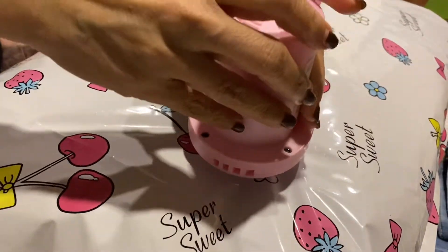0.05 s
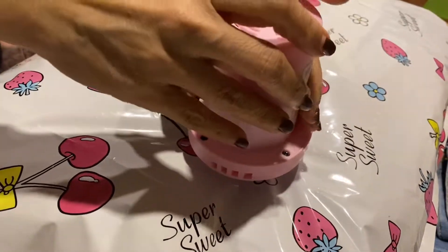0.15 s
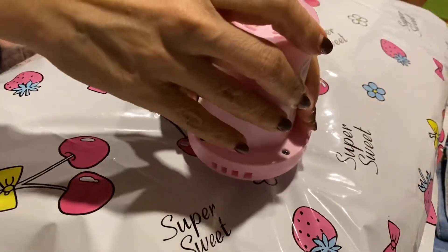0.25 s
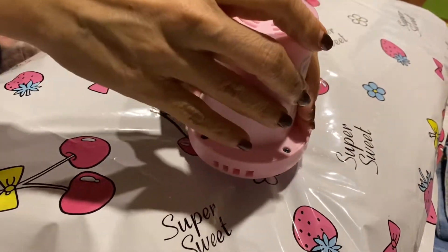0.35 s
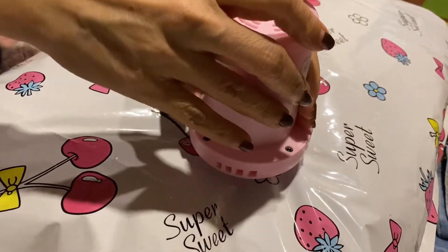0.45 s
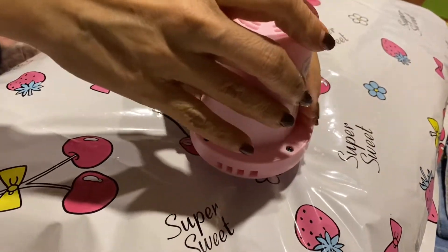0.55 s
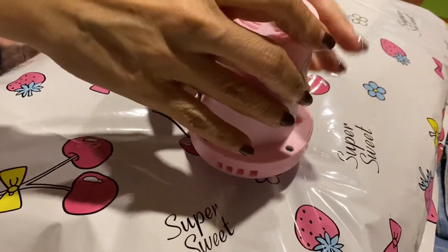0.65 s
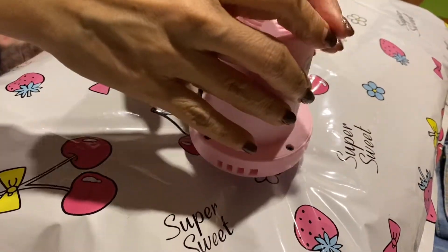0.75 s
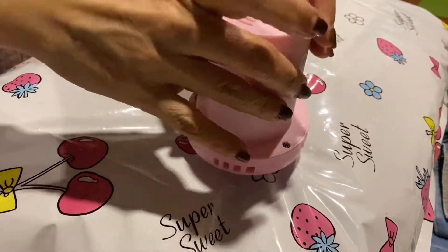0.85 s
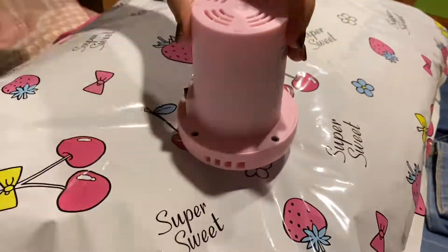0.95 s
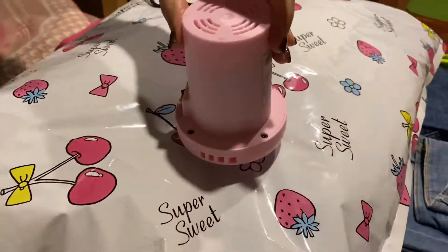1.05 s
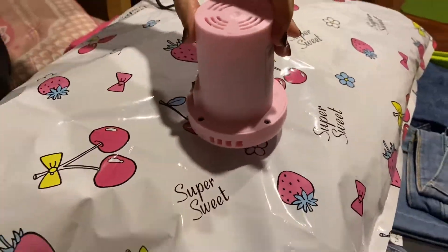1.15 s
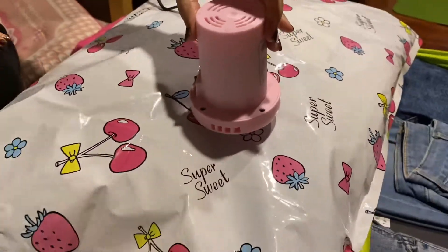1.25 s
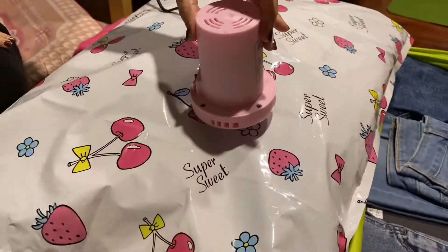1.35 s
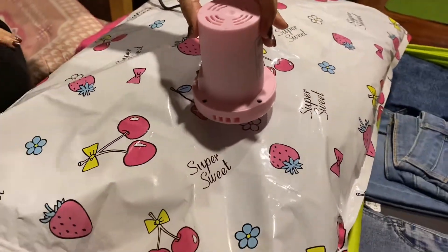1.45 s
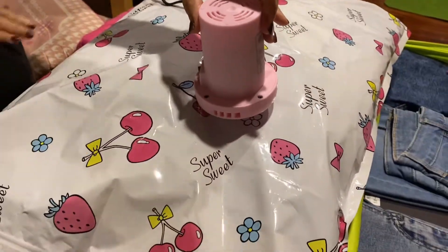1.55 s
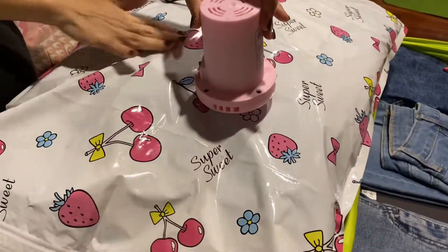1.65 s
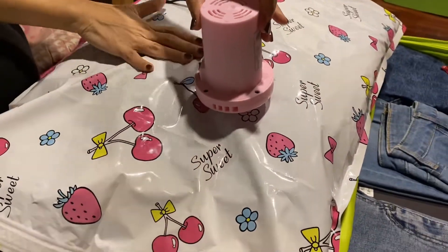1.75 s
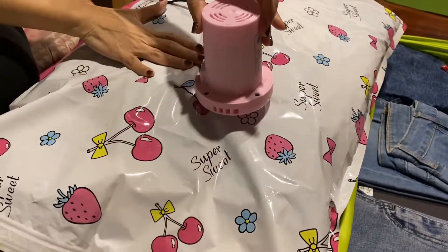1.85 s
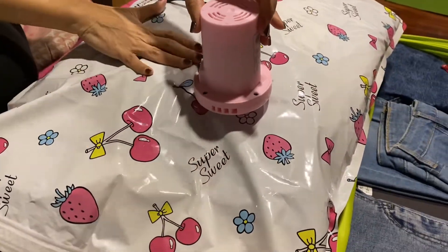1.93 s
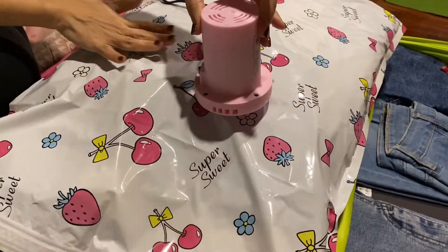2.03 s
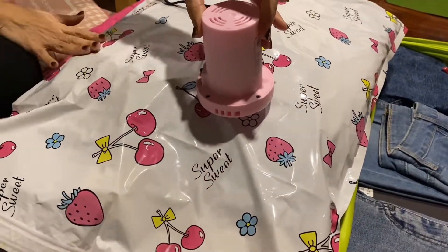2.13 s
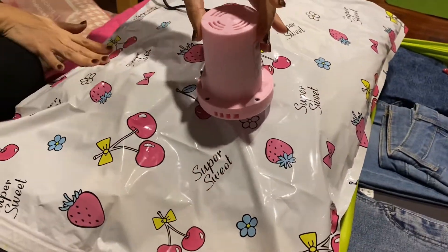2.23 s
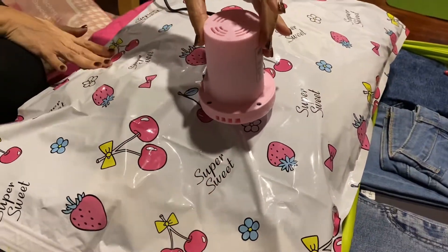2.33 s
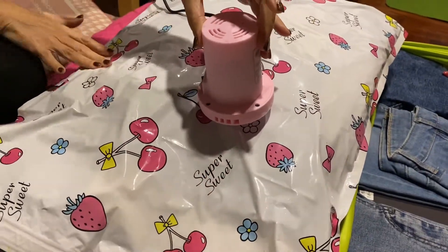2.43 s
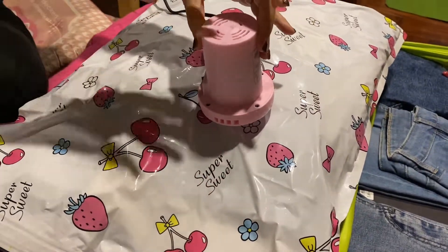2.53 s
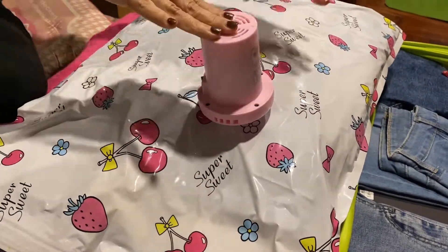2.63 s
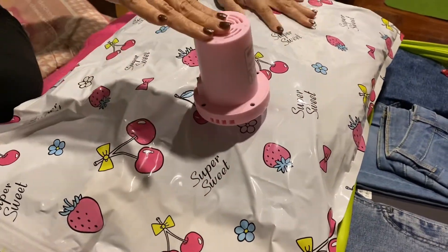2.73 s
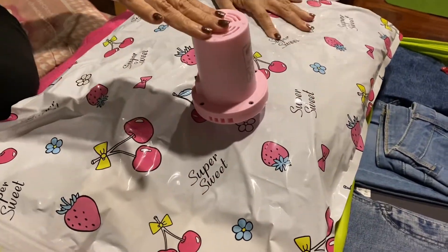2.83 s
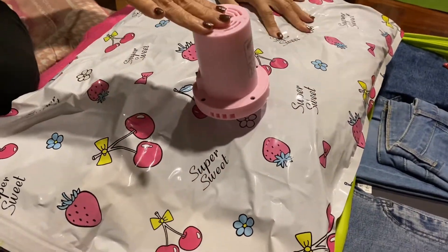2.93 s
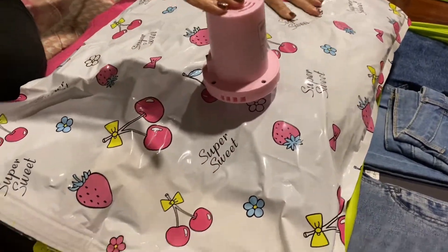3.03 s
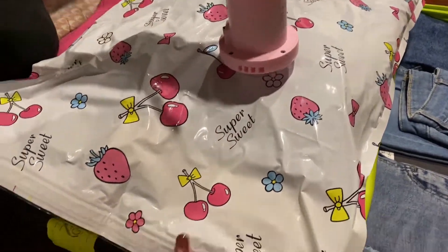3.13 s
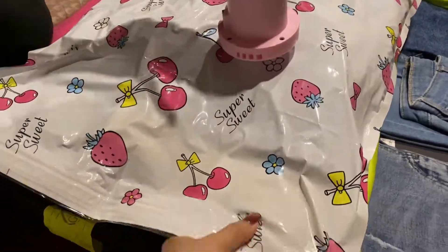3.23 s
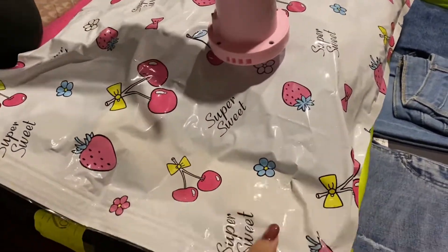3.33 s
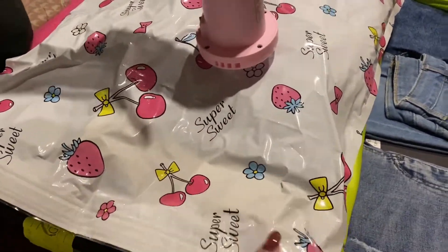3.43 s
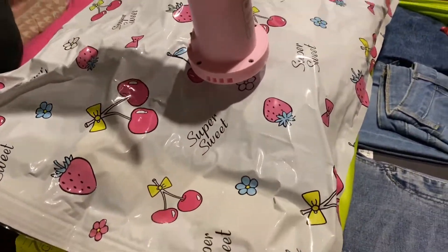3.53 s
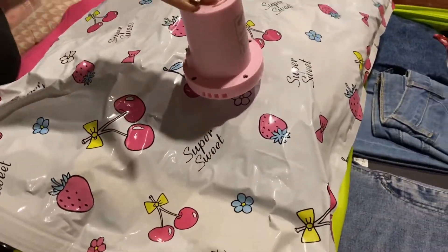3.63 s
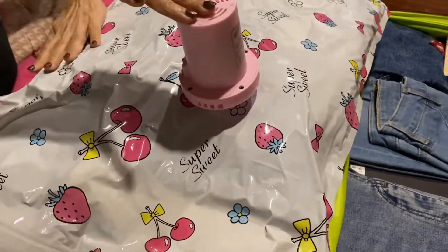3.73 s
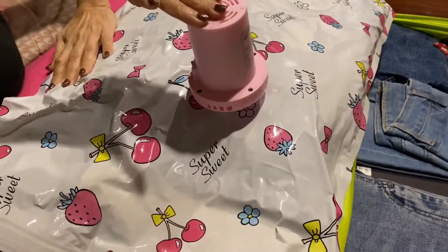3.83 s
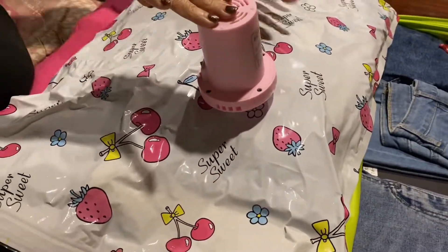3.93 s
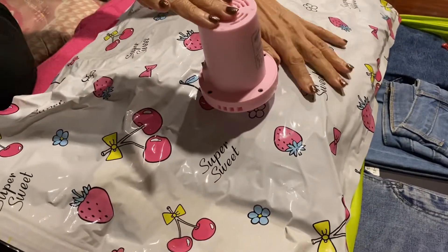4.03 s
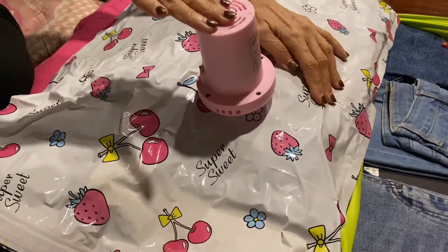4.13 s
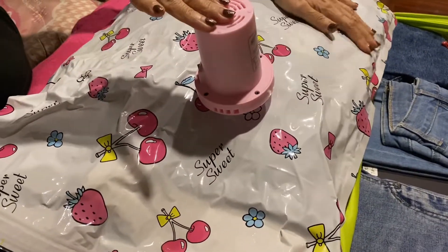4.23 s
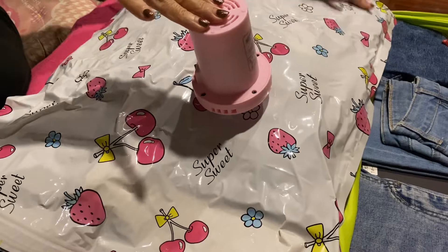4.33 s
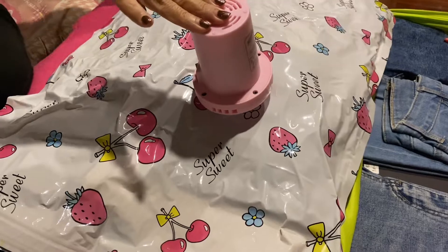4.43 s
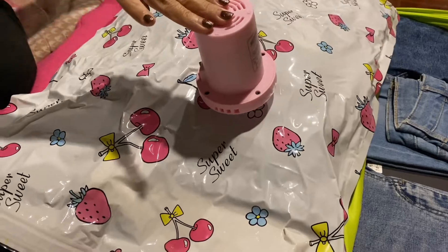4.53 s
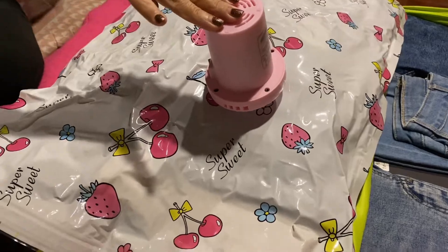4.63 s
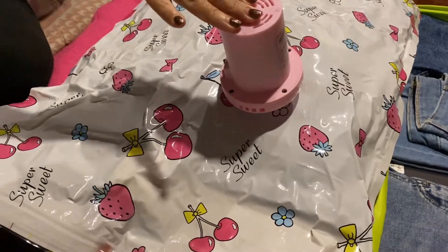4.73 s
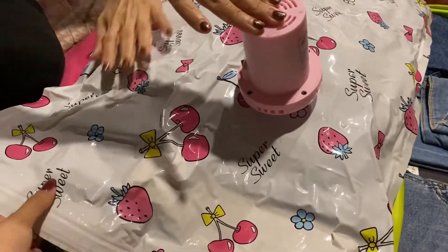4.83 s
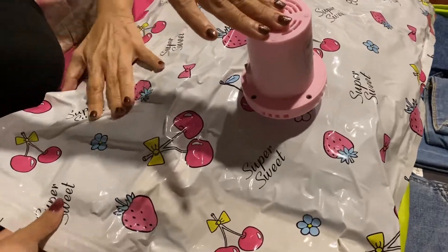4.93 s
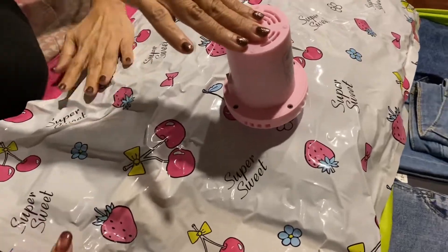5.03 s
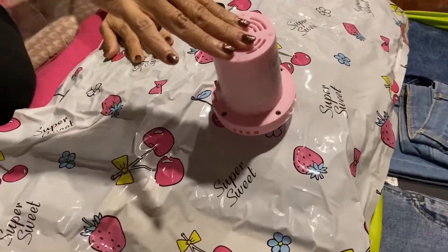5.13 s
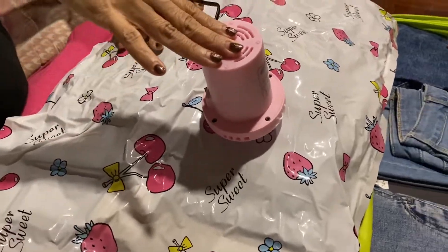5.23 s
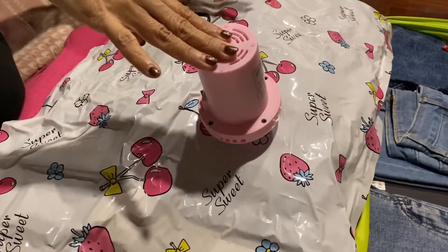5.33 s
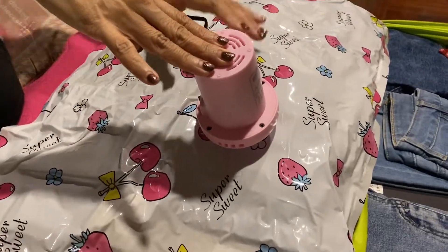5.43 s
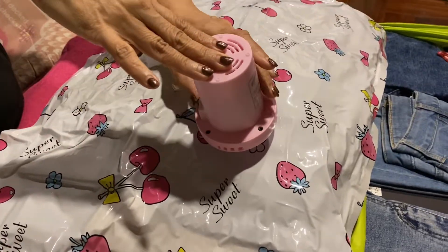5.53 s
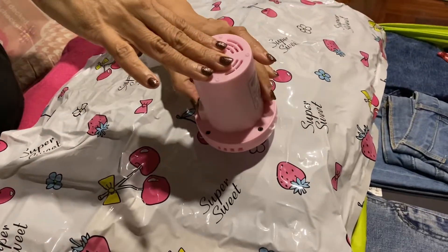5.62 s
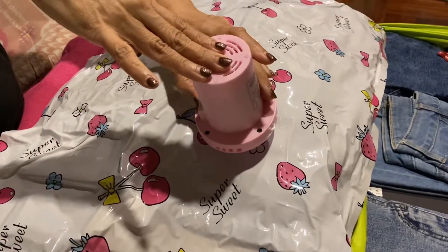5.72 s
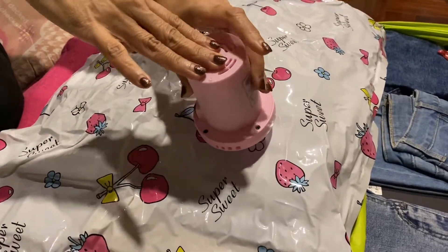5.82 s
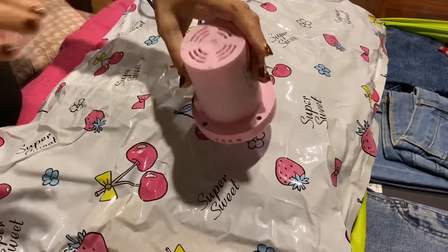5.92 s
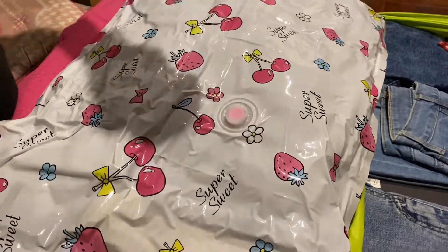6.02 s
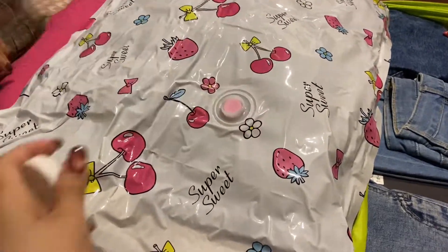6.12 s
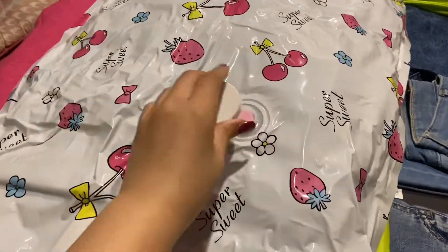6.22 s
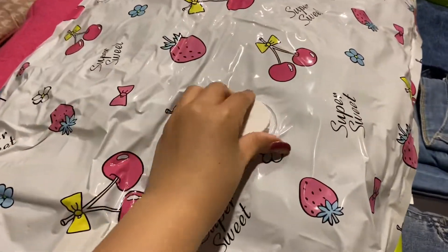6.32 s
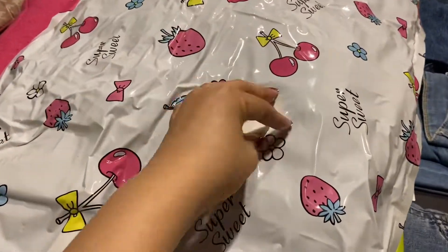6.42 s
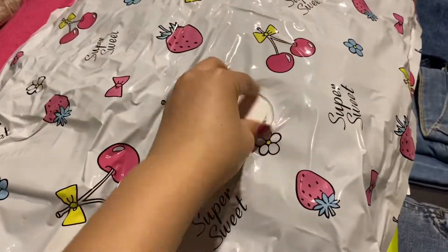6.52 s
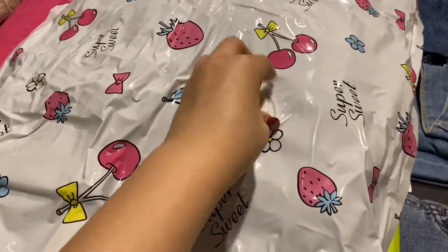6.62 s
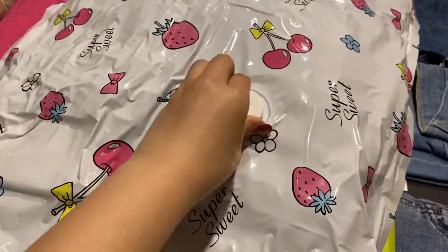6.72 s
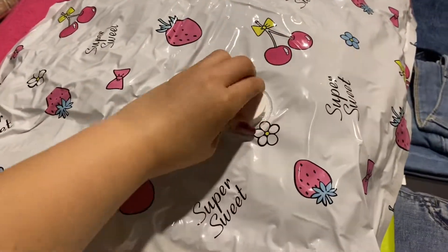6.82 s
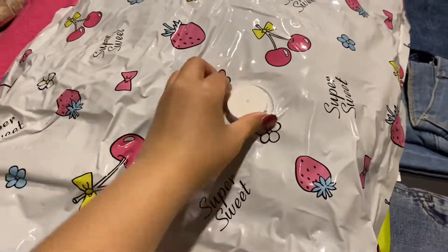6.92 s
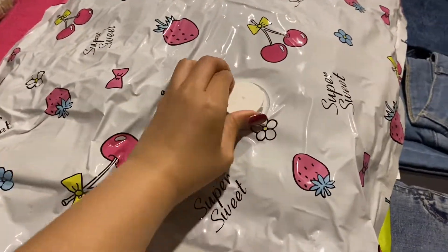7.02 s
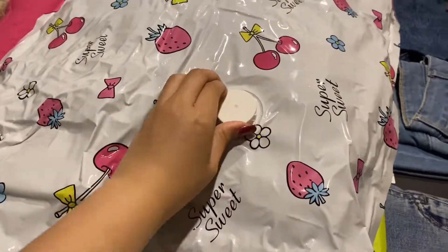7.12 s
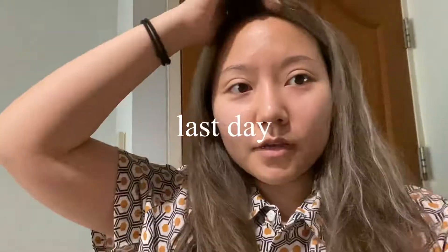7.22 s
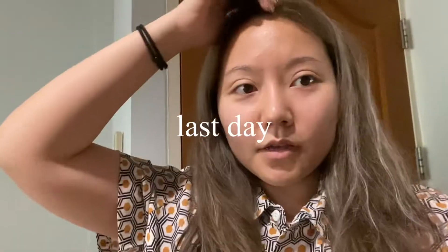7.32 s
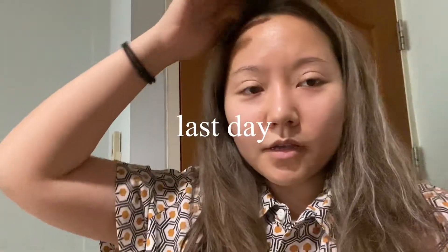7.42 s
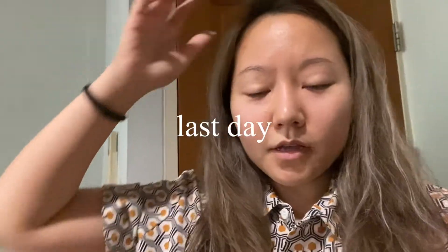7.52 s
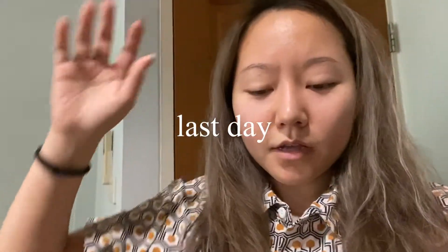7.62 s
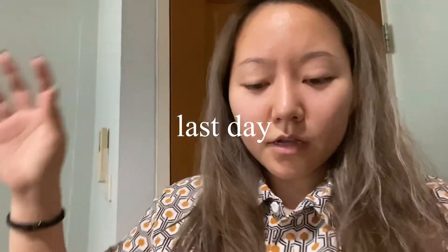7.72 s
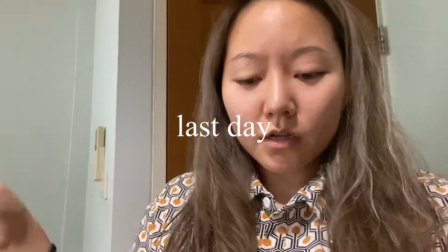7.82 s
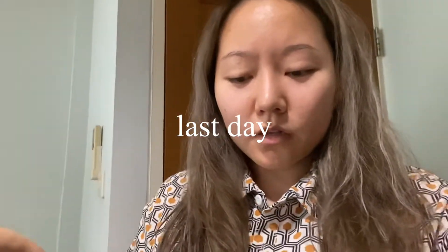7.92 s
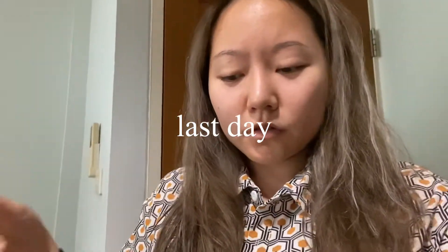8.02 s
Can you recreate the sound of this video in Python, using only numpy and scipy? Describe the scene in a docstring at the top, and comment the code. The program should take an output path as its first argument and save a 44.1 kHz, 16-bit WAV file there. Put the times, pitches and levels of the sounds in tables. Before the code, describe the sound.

A small pump clicks on, spins up, then races in sped-up time with a piercing whine and rushing air, runs down; bag crinkles, two clicks.

```python
"""Indoors, a small electric pump with an eight-vane impeller sucks air out of a plastic storage bag.
Its switch clicks and it spins up; then time runs fast: the rotor's pitch jumps two octaves, holds and runs down.
Rotor tones follow the shaft speed; noise coloured by duct and vents makes the rush of air. Fingers crinkle
the bag in sprays of tiny cracks. Back at normal speed, two sharp plastic clicks sound over the room's rumble."""
import sys
import numpy as np
from scipy import signal
from scipy.fft import rfft, irfft, next_fast_len
from scipy.io import wavfile
from scipy.ndimage import map_coordinates

SR = 44100
rng = np.random.default_rng(int(sys.argv[2]) if len(sys.argv) > 2 else 0)


def generate_wav(signal):
    """Clip the signal to [-1, 1] and save it as 16-bit WAV at the path in sys.argv[1]."""
    frames = np.transpose(np.atleast_2d(signal))
    scaled = np.clip(frames, -1, 1) * 32767
    pcm = np.round(scaled).astype(np.int16)
    wavfile.write(sys.argv[1], SR, pcm)


N = 355622
T = np.arange(N) / SR  # seconds

FAST_FROM, FAST_TO = .824, 7.208  # the stretch of fast time (s)
TIME_LAPSE = 4  # how many times faster it runs
ON_S, OFF_S = .31, 5.677  # the motor is switched on and off (s)
VANES = 8
COAST_ROUGH_DB = 2.2  # shaft tone and flow turn rough once the power is off


def amp(db):
    """Decibels to gain."""
    return 10 ** (np.asarray(db) / 20)


def unit(x):
    """Scale to rms 1."""
    return x / np.sqrt(np.mean(x ** 2) + 1e-20)


def along(points, hz):
    """Read a curve of (Hz, value) points on a log frequency axis."""
    f, v = np.transpose(points)
    return np.interp(np.log(hz + 1), np.log(f + 1), v)


def curves(rows):
    """One value per sample for each column after the time."""
    s, *cols = np.transpose(rows)
    return [np.interp(T, s, c) for c in cols]


def between(start, end, fade=0.01):
    """1 inside a span of time, with short fades."""
    return np.clip((T - start) / fade + .5, 0, 1) * np.clip((end - T) / fade + .5, 0, 1)


def wobble(rate):
    """A smooth random curve, rate knots a second."""
    coarse = T[::64]
    knots = rng.standard_normal(int(N * rate / SR) + 4)
    return np.interp(T, coarse, map_coordinates(knots, [coarse * rate]))


def filtered(x, response):
    """x times a complex response of frequency."""
    size = next_fast_len(N + 8192)
    return irfft(rfft(x, size) * response(np.fft.rfftfreq(size, 1 / SR)), size)[..., :N]


def noise(colour_db):
    """Stereo noise of rms 1, nearly alike in both ears: a strong middle and a weak side signal."""
    # stereo image: hz, left_right_likeness (-1 to 1)
    alike = [(100, .88), (400, .91), (2000, .91), (15000, .9)]

    def mid_and_side(hz):
        turn = np.arccos(np.clip(along(alike, hz), -1, 1)) / 2
        return amp(colour_db(hz)) * [np.cos(turn), np.sin(turn)]

    mid, side = filtered(rng.standard_normal((2, N)), mid_and_side)
    return unit(np.array([mid + side, mid - side]))


def air(spectrum):
    """Noise of rms 1 with a smooth spectrum."""
    return noise(lambda hz: along(spectrum, hz))


def tone(hz):
    """A sine of rms 1 that follows a pitch curve."""
    return np.sqrt(2) * np.sin(2 * np.pi * (np.cumsum(hz * np.ones(N)) / SR + rng.random()))


def add(track, s, sound):
    """Mix a short sound in at time s."""
    start = max(round(s * SR), 0)
    track[..., start:start + sound.shape[-1]] += sound[..., :N - start]


def shaft_speed():
    """Shaft turns a second as heard: spin up, hold under load, coast down against drag and friction."""
    # speed at which the load holds the shaft in fast time: time_s, shaft_hz
    cruise = [(1.2, 1522), (1.55, 1530), (2.07, 1525), (2.32, 1542), (2.75, 1550), (3.1, 1553), (3.2, 1511),
              (3.29, 1553), (3.5, 1558), (3.87, 1549), (4.1, 1558), (4.55, 1560), (4.72, 1553), (4.9, 1562),
              (5.67, 1567)]
    free_hz, spin_rate = 412.5, 1.09  # at normal speed: unloaded speed, rate of approach (per s)
    drag_rate, friction_hz = 2.75, 300  # fast time: air drag (per s), speed where bearing friction equals it
    pace = np.where(T >= FAST_FROM, TIME_LAPSE, 1)
    age = np.maximum(T - ON_S, 0) + (TIME_LAPSE - 1) * np.maximum(T - FAST_FROM, 0)
    rising = free_hz * np.tanh(spin_rate * age) * pace
    driven = np.minimum(rising, curves(cruise)[0])
    coasting = np.exp(-drag_rate * np.maximum(T - OFF_S, 0))
    return np.maximum((driven + friction_hz) * coasting - friction_hz, 0)


def log_speed(hz, full_hz):
    """Decades of speed above full_hz; levels grow by so many dB a decade."""
    return np.log10(np.maximum(hz, 1) / full_hz)


def nearness():
    """1 while the microphone is close to the pump, 0 once it has backed away."""
    back_off_s, back_off_tau_s = 1.152, 0.085  # middle and time constant of the move
    return (1 - np.tanh((T - back_off_s) / (2 * back_off_tau_s))) / 2


def tightness():
    """How tightly the bag is drawn, 0-1."""
    # the bag tightens, then lets go: time_s, tightness (0-1)
    tight = [(1.2, 0.03), (2.6, 0.24), (3.6, 0.51), (5, 0.76), (5.68, 0.87), (5.76, 0.3)]
    return np.clip(curves(tight)[0], 0, 1)


def shifts():
    """Change of duct and vent level in dB as the nozzle shifts on the valve."""
    # the duct is choked or air hisses past: time_s, half_length_s, roar_db, hiss_db
    nozzle_shifts = [(2.002, .085, -2.5, 1.5), (2.609, 0.019, -5.5, 0), (3.166, 0.047, -9.5, 2),
                     (3.22, .012, -1, 4), (3.357, .06, 1, 0), (4.894, 0.092, 0, 3.5)]
    s, half, choke_db, leak_db = np.transpose(nozzle_shifts)
    shifted = np.exp(-((T - s[:, None]) / half[:, None]) ** 4)
    return choke_db @ shifted, leak_db @ shifted


def whine():
    """Shaft orders and the vane tone sweep through the housing's resonances; turbulence makes them flutter."""
    # the shaft tone swells and fades during the run, before speed and nearness: time_s, level_db
    shaft_level = [(1.12, -49.5), (1.21, -50), (1.36, -43.5), (1.68, -51), (2.27, -43.5), (2.44, -53.5),
                   (3.07, -49), (3.3, -48.5), (3.58, -54.5), (4.58, -45.5), (5.67, -49.5)]
    # shaft overtones at full speed: multiple, slack_bag_db, tight_bag_db
    orders = [(2, -55, -76), (3, -50, -56), (4, -54, -75), (5, -72, -61), (6, -61, -80), (7, -53, -59)]
    # the vane tone swells and fades, before the housing and nearness: time_s, level_db
    vane_level = [(1.3, -37), (1.7, -49), (2.3, -42), (2.6, -41), (4.95, -38), (5.1, -44), (5.68, -45)]
    # how the housing passes the vane tone: pitch_hz, gain_db
    vane_pass = [(1500, -42), (2300, -30), (2750, -26), (3650, -15), (4100, -5), (4600, 3.5), (5200, 7),
                 (5450, -8), (5900, -8), (6800, -13.5), (8200, -15.5), (10600, -10), (12000, -3)]
    # the vane tone's octave comes out as the impeller coasts: pitch_hz, level_db
    octave_pass = [(3500, -95), (4800, -73), (5600, -63), (7700, -63), (10000, -71), (11500, -72),
                   (14000, -120)]
    near_shaft_db, near_vane_db = 16.5, 3.1  # what being close adds
    shake_hz, shake_width_hz, shake_boost_db = 1140, 70, 8.5  # housing resonance: centre, half width, boost
    vane_flutter_db = 1.8

    shaft_hz = shaft_speed() * (1 + .0006 * wobble(60))
    speed = log_speed(shaft_hz, shaft_hz.max())
    off = T > OFF_S

    shake_db = shake_boost_db / (1 + ((shaft_hz - shake_hz) / shake_width_hz) ** 2)
    hum_db = curves(shaft_level)[0] + near_shaft_db * nearness() + 50 * speed + shake_db
    hum_db = hum_db - 20 * np.maximum(T - OFF_S, 0)  # fades as it coasts
    hum_db = hum_db + 0.73 * wobble(35) + COAST_ROUGH_DB * wobble(170) * off
    hum = amp(hum_db) * tone(shaft_hz)

    tight = tightness()
    overtones = np.zeros(N)
    for multiple, slack_db, tight_db in orders:
        order_db = slack_db + (tight_db - slack_db) * tight + 2.0 * wobble(24.98)
        overtones += amp(order_db) * tone(round(multiple) * shaft_hz)
    overtones *= amp(150 * speed + 0.27 * shifts()[0])

    vane_hz = VANES * shaft_hz
    blurred_hz = vane_hz + 45 * wobble(370) * off  # the unpowered impeller runs unevenly
    vane_db = curves(vane_level)[0] + along(vane_pass, vane_hz) + near_vane_db * nearness()
    vanes = amp(vane_db + vane_flutter_db * wobble(50)) * tone(blurred_hz)
    octave = amp(along(octave_pass, 2 * vane_hz) + vane_flutter_db * wobble(70)) * tone(2 * blurred_hz)
    return (hum + overtones + vanes + octave) * between(FAST_FROM, 6.2)


def rippled(x):
    """Nearby surfaces add weak echoes that comb the spectrum."""
    # echoes off the bag, hand and furniture: delay_s, level_db
    near_echoes = [(.0031, -19), (.0058, -17), (.0097, -16)]
    echoes = sum(amp(db) * np.roll(x, round(delay * SR), axis=-1) for delay, db in near_echoes)
    return unit(x + echoes)


def duct():
    """Noise in the duct, whose resonances glide as the bag tightens."""
    # spectrum of the noise in the duct: hz, relative_db
    duct_noise = [(80, -87), (300, -36.5), (1100, -21.5), (1350, -13.5), (1700, -12), (1900, -2),
                  (2500, -1), (2900, -8), (3600, -4), (4300, -2.5), (5800, -9), (7000, -10), (10000, -30)]
    # close up the duct sounds hollower: hz, gain_db
    near_duct = [(1900, 1), (2750, 6), (3400, 2), (4300, -1), (5500, -9), (9000, 2)]
    # duct peaks and dips: slack_hz, tight_hz, half_width_hz, slack_db, tight_db
    duct_modes = [(2110, 1794, 114, 0, 10.5), (2210, 2160, 150, -2, 7), (2730, 2460, 70, 1, 5),
                  (3180, 2900, 75, 6, 1.5), (3437, 3240, 50, 7.5, 16), (4220, 3980, 124, 5, 8.5),
                  (4850, 4650, 53, -7, -1), (5000, 4500, 80, 3, 6.5), (5380, 5900, 54, 0, 5.5),
                  (5800, 5700, 80, -6, 4), (6200, 6000, 150, 2.5, 7.5), (8050, 7820, 77, -4, 20)]
    hz, s, z = signal.stft(air(duct_noise), SR, nperseg=2048)
    hz, tight = hz[:, None], np.interp(s, T, tightness())
    colour_db = along(near_duct, hz) * np.interp(s, T, nearness())
    for slack_hz, tight_hz, width, slack_db, tight_db in duct_modes:
        centre = slack_hz + (tight_hz - slack_hz) * tight
        height_db = slack_db + (tight_db - slack_db) * tight
        colour_db = colour_db + height_db / (1 + ((hz - centre) / width) ** 2)
    # each frame keeps an even strength whatever its colour
    strength = np.linalg.norm(amp(colour_db + along(duct_noise, hz)), axis=0)
    return signal.istft(z * amp(colour_db) / strength, SR, nperseg=2048)[1][:, :N]


def suction():
    """Air roars in the resonant duct and hisses out of vents: louder with speed, the roar also as the bag tightens."""
    # spectrum of the vent hiss: hz, relative_db
    vent = [(300, -67), (2500, -23), (5500, 4), (7500, -4), (9000, -2), (10000, -1.5), (11500, 3.5),
            (12900, 4.5), (14500, 1.5), (15800, -8)]
    # last puffs of air as the seal opens, before flutter: time_s, level_db, length_s
    puff_times = [(5.927, -50.5, 0.047), (6.026, -62.5, 0.081)]
    # spectrum of a puff: hz, relative_db
    puff_spectrum = [(100, -68), (2500, -25), (4000, -7), (5000, -1), (6000, 5), (7000, -16), (12000, -6),
                     (15500, -16)]
    slack_roar_db, tight_gain_db, vent_db = -43, 8.5, -46  # before the changes below
    near_db = 8  # what being close adds
    inrush_s, inrush_length_s, inrush_gain_db = 0.875, 0.099, 8  # air rushes in as the impeller first bites

    shaft_hz = shaft_speed()
    speed = log_speed(shaft_hz, shaft_hz.max())
    choke_db, leak_db = shifts()
    close_db = near_db * nearness()
    inrush_db = inrush_gain_db * np.exp(-((T - inrush_s) / inrush_length_s) ** 2)
    tightest = np.maximum.accumulate(tightness())
    roar_db = slack_roar_db + tight_gain_db * np.sqrt(tightest) + close_db + inrush_db + choke_db + 52 * speed
    hiss_db = vent_db + close_db + 0.5 * inrush_db + leak_db + 40 * speed
    flow = amp(roar_db) * rippled(duct()) + amp(hiss_db) * rippled(air(vent))

    lifted_db = -45 * np.maximum(T - 5.9, 0)  # the last of the flow dies as the pump is lifted
    puff_envelope = sum(amp(db) * np.exp(-((T - s) / length) ** 2) for s, db, length in puff_times)
    puffs = puff_envelope * air(puff_spectrum)
    flutter_db = 0.49 * wobble(45) + COAST_ROUGH_DB * wobble(260) * between(OFF_S, 9)
    return (flow * amp(lifted_db) + puffs) * amp(flutter_db) * between(FAST_FROM, 6.3)


def spin_up():
    """The drive sings steadily and whistles briefly; rotor and draught grow with speed; brushes tick once a turn."""
    # spectra of the draught's rush and hiss, and of the rubbing brushes: hz, relative_db
    rush_spectrum = [(30, -18), (90, -21), (180, -17), (280, -20), (400, -5), (520, -3.5), (680, -1),
                     (1000, -1.5), (1400, -14.5), (1700, -7), (2100, -32), (5000, -69.5)]
    hiss_spectrum = [(1200, -25), (2000, -6.5), (2500, -0.5), (3000, 9.5), (3500, 3.5), (4200, 2.5),
                     (5000, -1), (7000, -8.5), (10500, -6), (12200, -12), (15000, -4), (15800, -1.5)]
    brush_spectrum = [(1400, 3), (2300, -9), (2850, 13), (3300, 0), (3850, 6), (4300, -5), (5300, 2),
                      (7100, 1), (8200, -5), (11000, -18)]

    shaft_hz = shaft_speed()
    reached_hz = shaft_hz[T < FAST_FROM].max()
    shaft_hz = np.minimum(shaft_hz, reached_hz)
    speed = log_speed(shaft_hz, reached_hz)

    drive = amp(-52) * tone(790) * between(0.311, FAST_FROM)
    whistle_hz = 13500 + 17000 * np.clip(T - ON_S, 0, .08) + 450 * wobble(1500)
    whistle = amp(-52.5) * tone(whistle_hz) * between(0.34, 0.397, fade=.02)
    vanes = amp(-38 + 10 * speed + 3.4 * wobble(39.4)) * tone(VANES * shaft_hz)
    vanes = vanes * between(0.484, 9, fade=0.082)
    shaft = amp(-35.5 + 63 * speed) * tone(shaft_hz)
    rush = amp(-27 + 45 * speed + 1.1 * wobble(108.6)) * rippled(air(rush_spectrum))
    hiss = amp(-29.5 + 53.7 * speed) * air(hiss_spectrum)

    since_tick = (np.cumsum(shaft_hz) / SR - .75) % 1  # in turns
    ticking = 1 + 1.4 * np.exp(-since_tick / 0.052)
    brushes = amp(-56) * ticking * air(brush_spectrum) * between(0.3, FAST_FROM, fade=0.022)
    return drive + whistle + brushes + (vanes + shaft + rush + hiss) * between(ON_S, FAST_FROM)


def clicks(rows, modes):
    """A catch scrapes over its edge for milliseconds, rings the plastic, knocks the case and leaves a rattle."""
    # how the scrape's crack is coloured: hz, gain_db
    scrape_colour = [(200, -13.5), (1400, -26.5), (2300, -13.5), (3800, -5.5), (9000, 0), (15800, -2)]
    # spectrum of the rattle: hz, relative_db
    rattle_spectrum = [(100, 5), (250, 8.5), (380, 13.5), (580, -1), (880, 5.5), (1300, -1.5), (3000, -1),
                       (6500, -3.5), (10000, -1.5), (15000, -14)]
    rattle_life_s, side_db = .015, -19  # time constant; the part that differs between the ears
    boom_hz, boom_life_s, boom_db = 154, 0.042, -8  # the hollow case booms; level against the knock

    cracks, knocks, rattle_level = np.zeros((2, N)), np.zeros(N), np.zeros(N)
    t = np.arange(SR // 12) / SR
    ring = sum(amp(db - 60 * t / t60) * np.sin(2 * np.pi * hz * t) for hz, db, t60 in modes)
    thump = np.sin(2 * np.pi * 185 * t) * (t / 0.0021) * np.exp(1 - t / 0.0021)
    boom = amp(boom_db) * np.sin(2 * np.pi * boom_hz * t) * np.exp(-t / boom_life_s)
    case = np.sin(2 * np.pi * 870 * t) * np.exp(-t / .005) + boom
    for s, db, length, thump_db, case_db, rattle_db in rows:
        mid, side = rng.standard_normal((2, len(t)))
        envelope = np.exp(-(t / length) ** 2) * (1 - np.exp(-t / .0003))
        scrape = (mid + amp(side_db) * np.outer([1, -1], side)) * envelope
        rung = signal.fftconvolve(scrape, ring[None], axes=1)[:, :len(t)]
        crack = unit(rung) + 0.58 * unit(scrape)
        add(cracks, s, amp(db + 2) * np.sqrt(length * SR) * crack / np.linalg.norm(crack[0]))
        add(knocks, s, amp(thump_db) * thump + amp(case_db) * case)
        add(rattle_level, s, amp(rattle_db) * np.exp(-t / rattle_life_s))
    coloured = filtered(cracks, lambda hz: amp(along(scrape_colour, hz)))
    return coloured + knocks + rattle_level * air(rattle_spectrum)[0]


def brightened(sound, treble_db):
    """Raise or lower the treble of a short sound."""
    low = signal.lfilter(*signal.butter(1, 4500, fs=SR), sound)
    return low + amp(treble_db) * (sound - low)


def spiky(count, spread_db):
    """Noise whose level jumps at random every 16 samples, like tiny cracks."""
    jumps = np.repeat(rng.standard_normal(count // 16 + 1), 16)[:count]
    return rng.standard_normal(count) * amp(spread_db * jumps)


def crinkles():
    """Each fold of the film snaps in a short spray of tiny cracks; faint ticks come in between."""
    # crinkles of the bag, before treble and film colour: start_s, level_db, length_s, treble_gain_db
    folds = [(0.073, -61, 0.0045, -16), (0.123, -51, 0.0019, -18), (0.144, -66, .001, 3),
             (0.16, -70, 0.0036, -20), (.271, -51, 0.0019, -9), (6.1753, -62, 0.0011, 7),
             (6.265, -54, .002, -3), (6.27, -44, .0015, -10), (6.3045, -51, 0.0022, 0),
             (6.3174, -47, 0.0023, -5), (6.32, -52, 0.0022, -4), (6.3259, -45, 0.0025, -6),
             (6.33, -50, 0.0044, -4), (6.3514, -59, 0.0013, 6), (6.398, -58, .001, 5),
             (6.4082, -60, .003, 3), (6.421, -43.5, 0.0016, 2), (6.4924, -42.5, 0.0053, -4.5),
             (6.524, -50, 0.0044, 1), (6.531, -56.5, 0.024, 3), (6.563, -56, 0.0068, 4),
             (6.581, -54, 0.0023, 2), (6.593, -58.5, 0.0094, 3), (6.652, -47.5, 0.0044, 7),
             (6.8901, -57, .001, 6), (6.903, -45, 0.0089, 0), (6.931, -55, .002, 8), (6.937, -56, .002, 2),
             (7.018, -50, 0.0025, -7), (7.023, -45, 0.0016, -4), (7.029, -52, .002, -6),
             (7.042, -57, 0.014, -6), (7.1331, -62, .006, 1)]
    # how the film colours them: hz, gain_db
    film_colour = [(80, -45), (300, -17), (1200, -3.5), (2100, -1), (4200, -1), (8000, -4.5), (13000, -4.5),
                   (15800, -10)]
    track, t = np.zeros(N), np.arange(SR // 10) / SR
    for s, db, length, treble_db in folds:
        envelope = np.exp(-(t / length) ** 2) * (1 - np.exp(-t / (0.46 * length)))
        snaps = spiky(len(t), spread_db=6.5) * envelope
        snaps = amp(db) * np.sqrt(length * SR) * snaps / np.linalg.norm(snaps)
        add(track, s, brightened(snaps, treble_db))
    ticks = amp(-82.5) * unit(spiky(N, spread_db=9)) * between(4.9, FAST_TO, fade=0.051)
    return filtered(track + ticks, lambda hz: amp(along(film_colour, hz)))


def bumps():
    """Soft knocks of fingers finding the switch: dull noise that starts at once and dies away."""
    # fingers on the housing: start_s, level_db (1 dB is added below), decay_s
    knocks = [(.003, -41.5, 0.014), (0.038, -51, 0.056), (0.073, -45, 0.013), (0.117, -48, 0.0085),
              (0.172, -43.5, 0.0078), (0.268, -41.5, 0.0076)]
    envelope, t = np.zeros(N), np.arange(SR // 10) / SR
    for s, db, length in knocks:
        add(envelope, s, amp(db + 1) * np.exp(-t / length) * (1 - np.exp(-(t / 0.0011) ** 2)))
    return envelope * air([(100, 1), (480, 1.5), (1200, -6.0), (4000, -20.5), (12000, -61)])


def squeaks():
    """The nozzle's rim slips on the valve with a thin chirp, unsteady in pitch and level."""
    # squeaks as the suction lets go and the pump is lifted: peak_s, pitch_hz, level_db, time_constant_s
    chirps = [(5.707, 1660, -43.5, 0.013), (5.79, 2140, -42.5, 0.02), (5.982, 3110, -54, 0.012),
              (6.123, 3140, -69, .012), (6.2, 3120, -82, .035)]
    track = np.zeros(N)
    for s, hz, db, length in chirps:
        envelope = amp(db + 1.5 * wobble(90)) * np.exp(-np.abs(T - s) / length)
        track += envelope * tone(hz * (1 + 0.016 * wobble(200)))
    return track


def room(x, pace=1):
    """The walls answer; the treble dies first."""
    # decay of the room at normal speed: hz, t60_s
    walls = [(200, 0.32), (2000, 0.41), (7000, 0.21), (15000, 0.12)]
    hz, t, z = signal.stft(rng.standard_normal((2, SR // 2)), SR, nperseg=256)
    tail = signal.istft(z * amp(-60 * pace * t / along(walls, hz)[:, None]), SR, nperseg=256)[1]
    return signal.fftconvolve(x[None], tail / np.linalg.norm(tail[0]), axes=1)[:, :N]


def room_tone():
    """A low rumble, which in fast time is thin, quiet and higher: one track for each pace."""
    # spectra of the room air, at the opening and in fast time: hz, relative_db
    opening_air = [(25, 2), (55, 7), (100, 7.5), (170, -2.5), (250, 5.5), (420, -9), (800, -18),
                   (1700, -11), (2500, -25), (3000, -25), (4500, -40), (8000, -48), (12000, -54),
                   (15000, -46)]
    fast_air = [(50, -33), (100, -31), (145, 0.5), (215, 3), (290, -1.5), (600, -3), (950, -4),
                (1400, -10.5), (2500, -18.5), (6500, -21), (10000, -28.5), (15000, -33)]
    # room tones in fast time, wavering a little: pitch_hz, level_over_room_air_db
    hum_tones = [(221, -10), (398, -9.5), (581, -13), (964, -10)]
    # room air in fast time: time_s, level_db
    fast_level = [(.8, -67.5), (5.3, -69), (5.9, -64.5), (7.2, -63)]
    hum = sum(amp(db + 2.4 * wobble(2.9)) * tone(hz * (1 + 0.0019 * wobble(24.9))) for hz, db in hum_tones)
    fast = amp(curves(fast_level)[0]) * (air(fast_air) + hum)
    opening = amp(-49) * air(opening_air)
    return opening * between(-1, FAST_FROM), fast * between(FAST_FROM, FAST_TO)


def closing_room():
    """An uneven rumble with a restless low drone in it, and one soft rustle."""
    # spectrum of the room air at the end: hz, relative_db
    closing_air = [(25, -10), (90, -9), (170, -2), (300, -10), (500, -11.5), (800, -12.5), (1100, -21.5),
                   (2000, -22.5), (3000, -34.5), (4200, -38.5), (5500, -47), (8000, -49.5), (10000, -54.5),
                   (15000, -58)]
    # a low hum wavers in the room: pitch_hz, first_db, last_db
    drone_tones = [(147, -51.5, -57.5), (175, -64.5, -50), (225.6, -53, -58), (301, -57.5, -60.5),
                   (375, -61.5, -66.5), (452, -70.5, -57.5)]
    # phase by which the left port leads in the closing room: hz, lead_rad
    closing_lead = [(350, 0), (900, 1.5), (5000, 1.9), (9200, -3.2), (16000, -10.6)]
    unrest = .8  # depth of the drone's random swelling (share)
    rustle_s, rustle_length_s, rustle_db = 7.97, 0.024, -67

    drone = np.zeros(N)
    for hz, first_db, last_db in drone_tones:
        level = amp(np.interp(T, [FAST_TO, T[-1]], [first_db, last_db]))
        swelling = (1 + unrest * wobble(24)) / np.hypot(1, unrest)
        drone += level * swelling * tone(hz * (1 + .02 * wobble(12)))
    rumble = amp(-49.5 + 1.4 * wobble(11)) * air(closing_air)
    rustle = amp(rustle_db) * np.exp(-((T - rustle_s) / rustle_length_s) ** 2) * rng.standard_normal(N)
    sound = (rumble + drone + rustle) * between(FAST_TO, 10)
    return ported(sound, lambda hz: -1.5, lambda hz: np.interp(hz, *np.transpose(closing_lead)))


def ported(sound, left_db, lead):
    """Split a level difference and a phase lead evenly between left and right."""
    def response(hz):
        difference = np.log(10) / 20 * left_db(hz) + 1j * lead(hz)
        return np.exp(np.outer([1, -1], difference) / 2)

    return filtered(sound, response)


def microphones(sound, pace=1):
    """Two ports differ in level and phase; in fast time the pattern moves up with the pitch."""
    # how much louder the left port is at normal speed: hz, difference_db
    left = [(40, 0), (110, -2.5), (300, 0), (500, 1.5), (760, 7.5), (950, 1), (1450, 7), (2100, 1.5),
            (2700, -3.5), (3080, 2.5), (3800, -3), (5700, 4), (8000, 0)]
    # phase by which the left port leads at the bag at normal speed: hz, lead_rad
    bag_lead = [(0, 0), (650, .4), (1300, 1), (1600, 3.1), (1980, 6), (2700, 7.9), (3070, 9.4),
                (4000, 12.4), (5600, 13.7), (16000, -3.2)]
    lead = lambda hz: np.interp(hz / pace, *np.transpose(bag_lead))
    return ported(sound, lambda hz: along(left, hz / pace), lead)


def scene():
    """The start at normal speed, the long run in fast time with a room answer four times shorter, the clicks."""
    # the pump's switch, pressed and latching, then the closing clicks (2 dB is added to each crack):
    # start_s, crack_db, scrape_length_s, thump_db, case_knock_db, rattle_db
    switch_rows = [(.309, -28, .0022, -60, -56, -46), (.3115, -20.5, .001, -50, -52, -44)]
    click_rows = [(7.219, -22.5, 0.0041, -62.5, -56.5, -56.5), (7.222, -11.5, 0.002, -26.5, -28, -36.5),
                  (7.3284, -12, 0.0036, -22, -45.5, -58.5)]
    # ringing of the switch and of the plastic: pitch_hz, relative_db, t60_s
    switch_ring = [(2520, 5, 0.011), (3040, 3.5, 0.0061), (3740, 0, .007), (5300, -6, .003),
                   (6560, 4, .007), (8300, 5, 0.0044), (14600, 0, .003)]
    plastic = [(2830, -6.5, .005), (4000, 0, 0.0078), (6570, 1, 0.0087), (8850, 0.5, 0.0036),
               (10140, 6.5, 0.0073), (11200, 2.5, 0.00303), (12900, -3, .003), (13900, 8.5, .0035)]
    # how the clicks are coloured on their way to the walls: hz, gain_db
    throw = [(200, 3.5), (2000, 1.5), (4000, -4), (6500, -2.5), (8500, -2.5), (10200, 1.5), (15000, -0.5)]
    click_room_db, whine_room_db, film_room_db = -26, -14, -12  # what each sends to the walls

    opening_air, fast_air = room_tone()
    switch, snaps = clicks(switch_rows, switch_ring), clicks(click_rows, plastic)
    tones, film = whine(), crinkles()
    start = microphones(spin_up() + bumps() + switch + opening_air)
    run = microphones(tones + suction() + squeaks() + film + fast_air, TIME_LAPSE)
    thrown = filtered((switch + snaps).mean(axis=0), lambda hz: amp(along(throw, hz)))
    click_walls = amp(click_room_db) * room(thrown)
    run_walls = room(amp(whine_room_db) * tones + amp(film_room_db) * film, TIME_LAPSE)
    return start + run + snaps + click_walls + run_walls + closing_room()


def record(dry):
    """The sharpest peaks are rounded off, and nothing is kept above the band limit."""
    ceiling, top_hz = .95, 16300
    rounded = dry / (1 + (dry / ceiling) ** 4) ** (1 / 4)
    return filtered(rounded, lambda hz: np.clip((top_hz - hz) / 600, 0, 1))


dry = scene()
out = record(dry)
generate_wav(out)
```